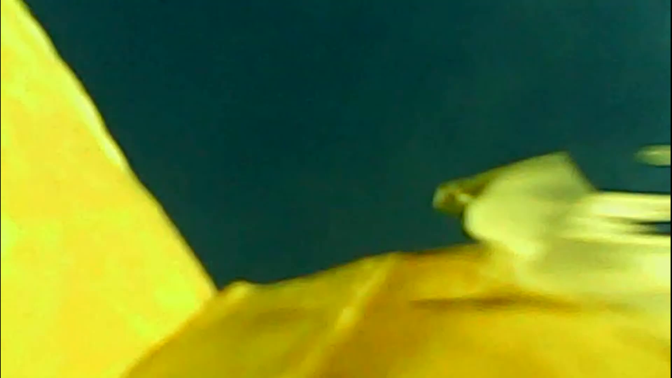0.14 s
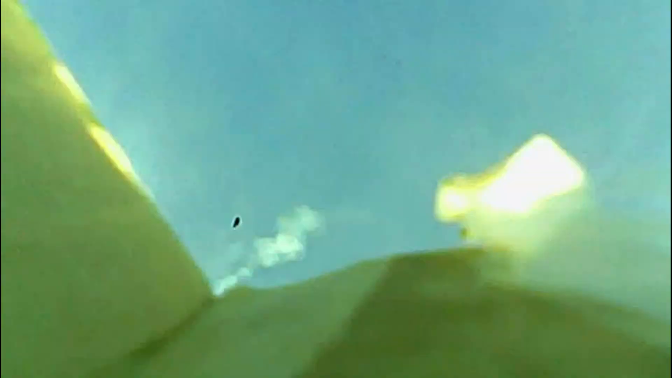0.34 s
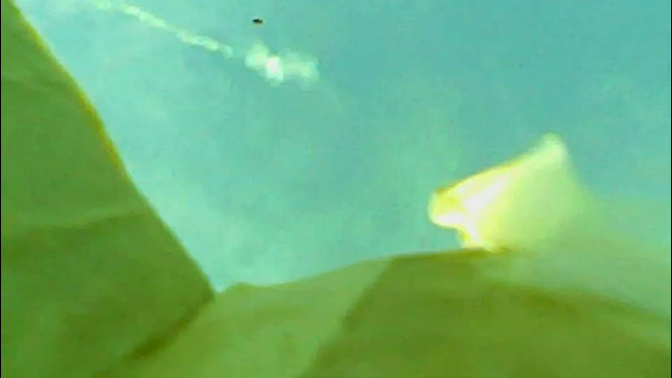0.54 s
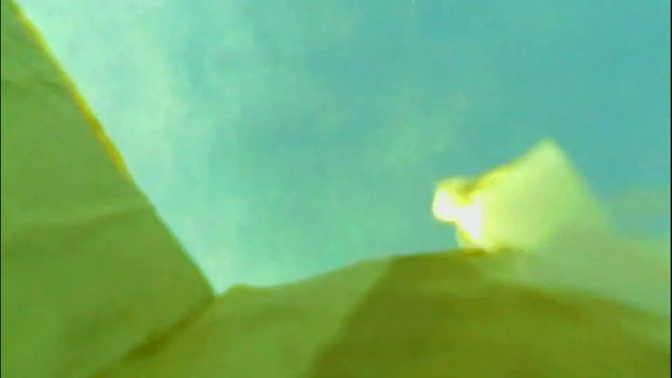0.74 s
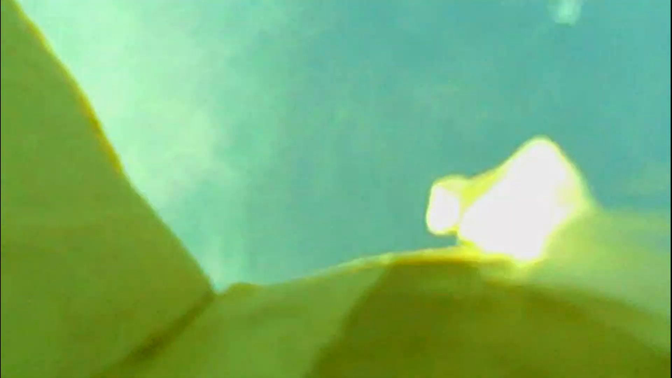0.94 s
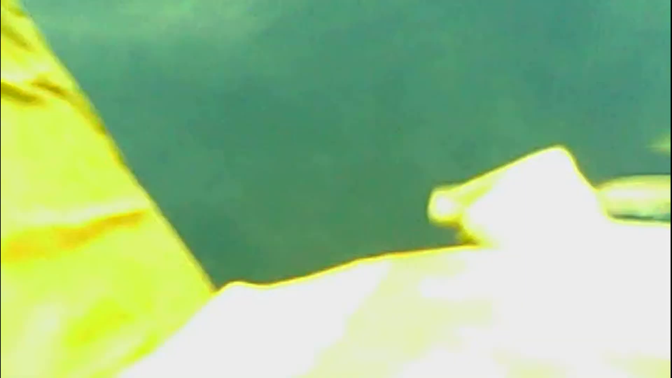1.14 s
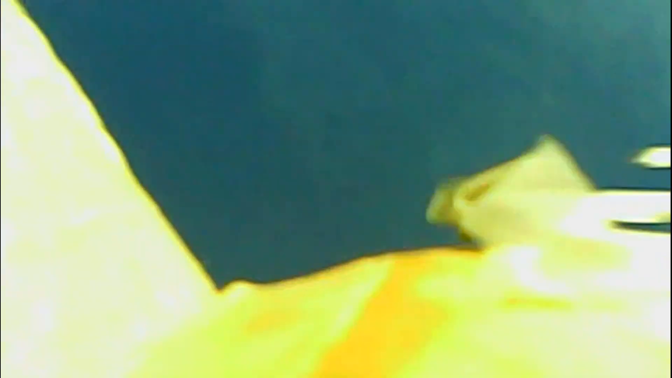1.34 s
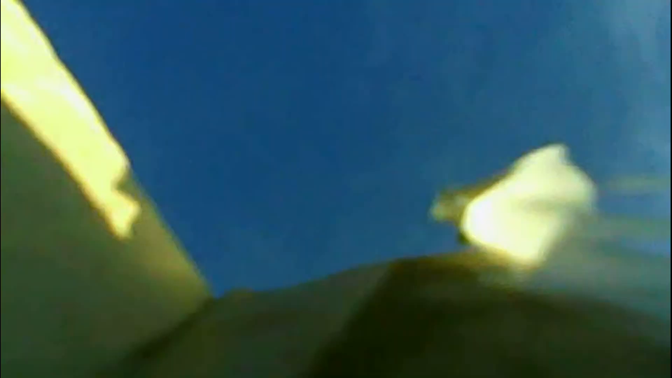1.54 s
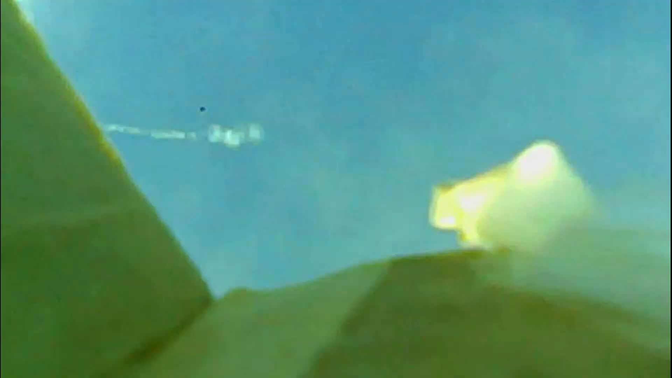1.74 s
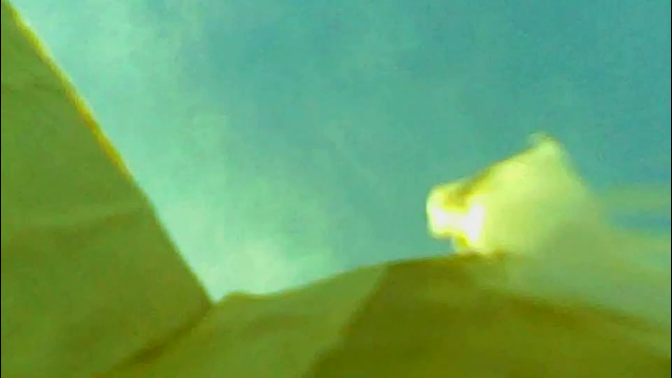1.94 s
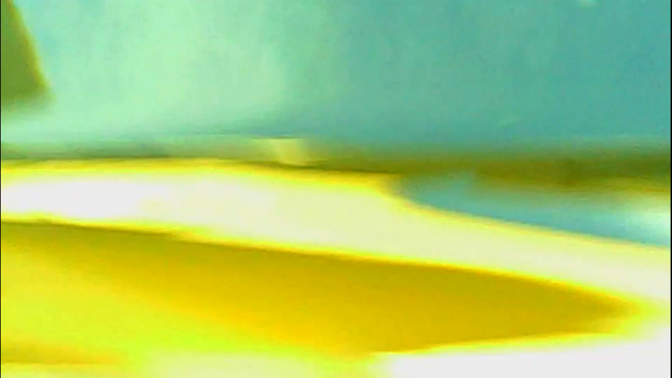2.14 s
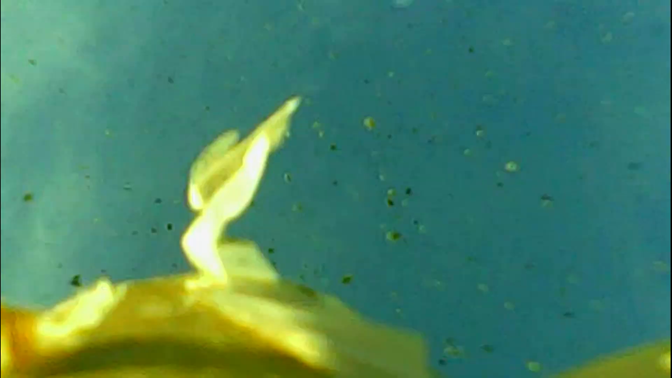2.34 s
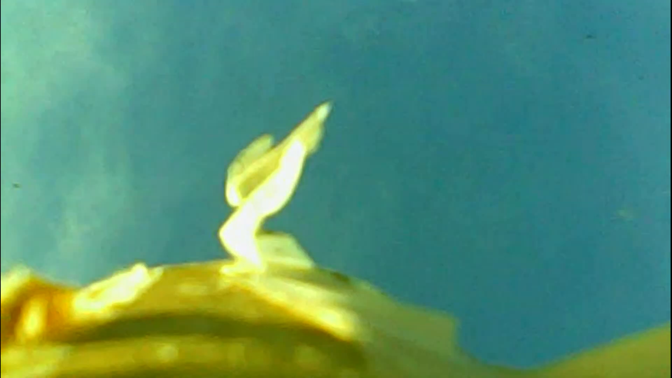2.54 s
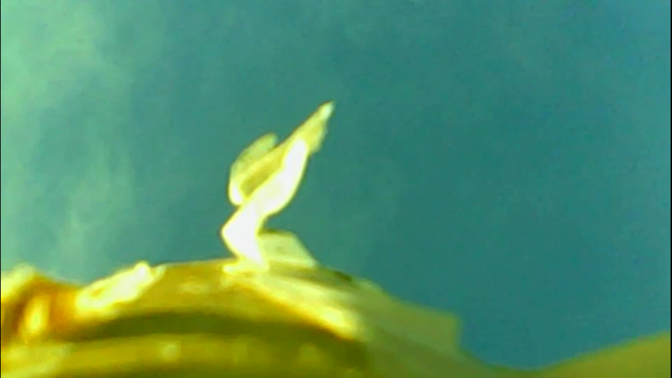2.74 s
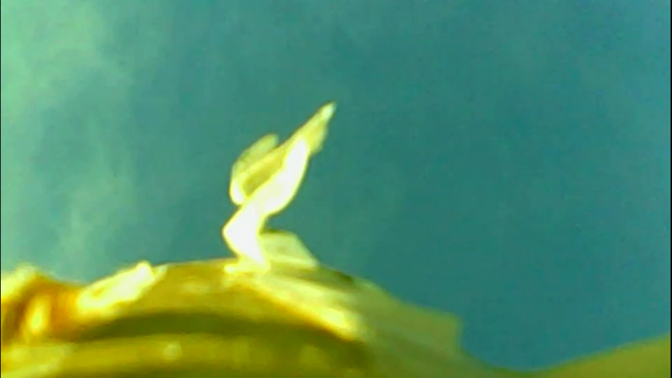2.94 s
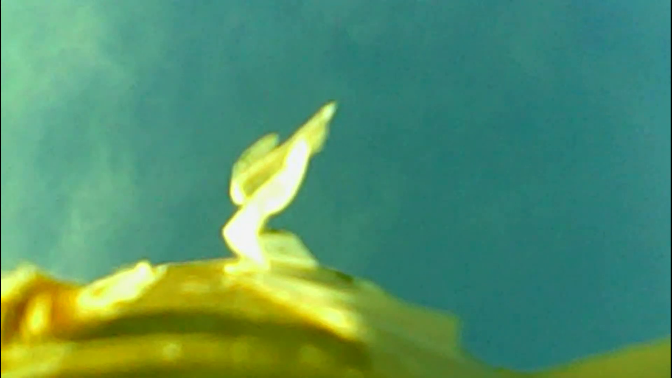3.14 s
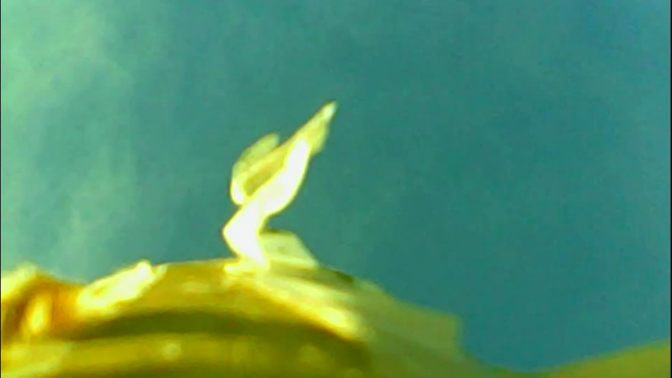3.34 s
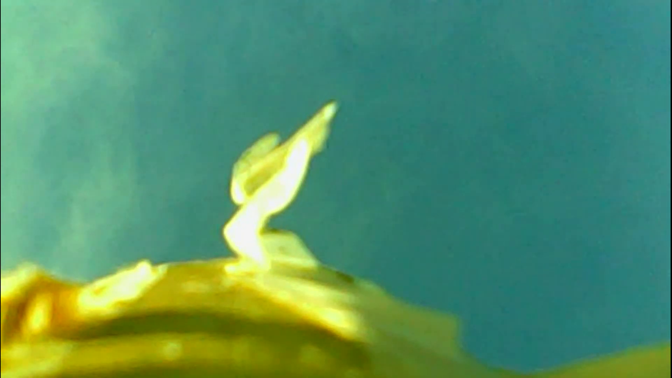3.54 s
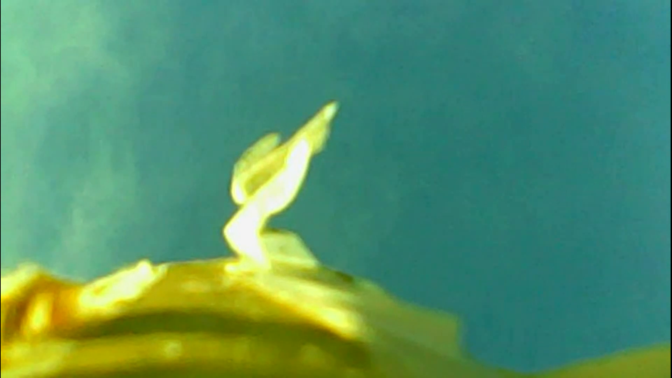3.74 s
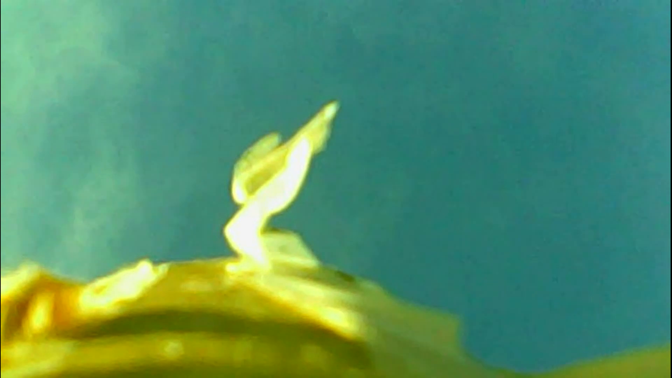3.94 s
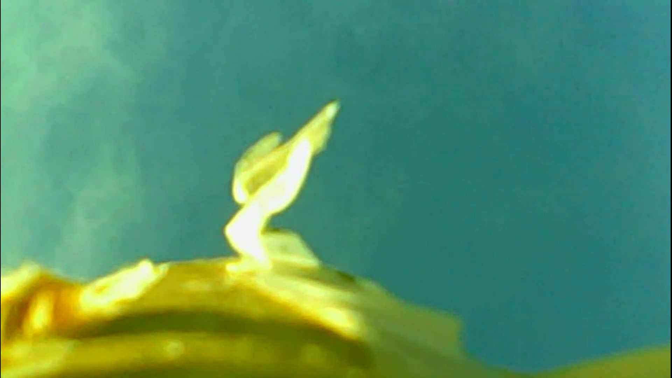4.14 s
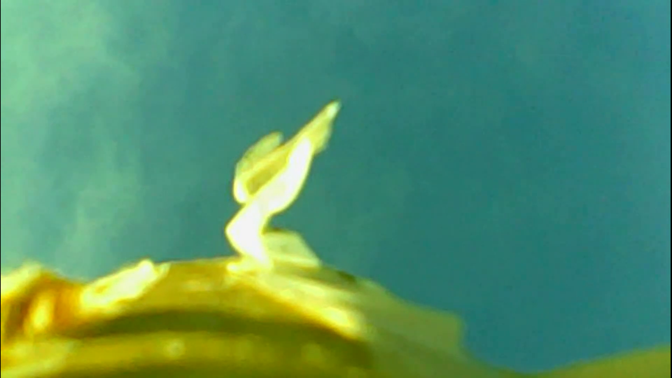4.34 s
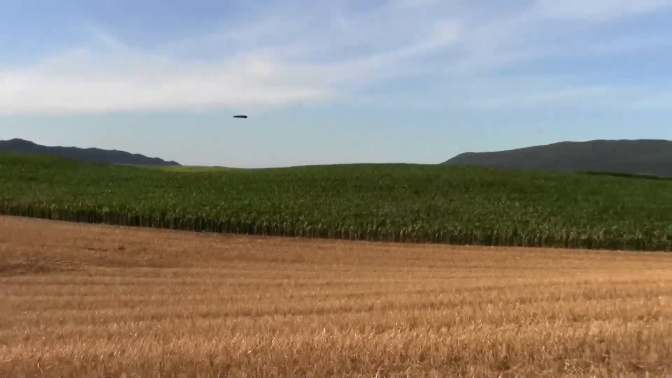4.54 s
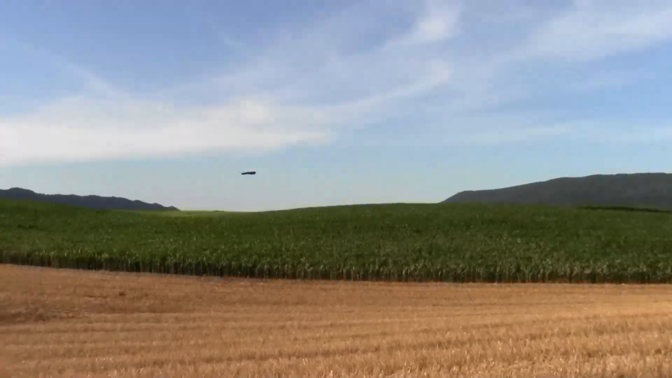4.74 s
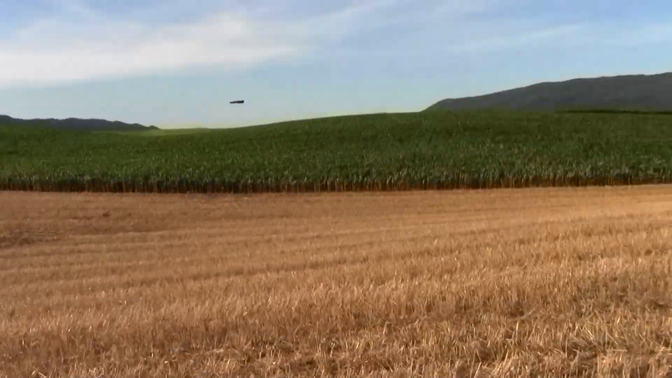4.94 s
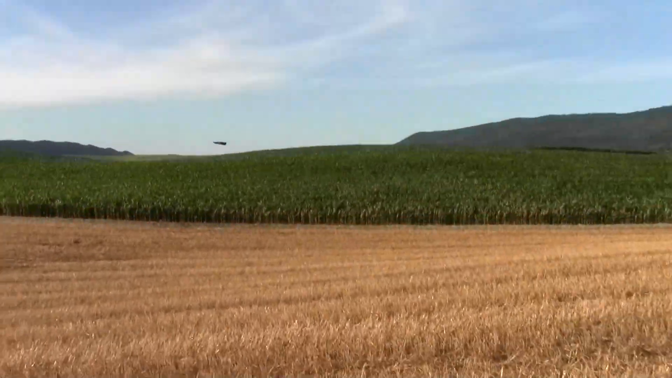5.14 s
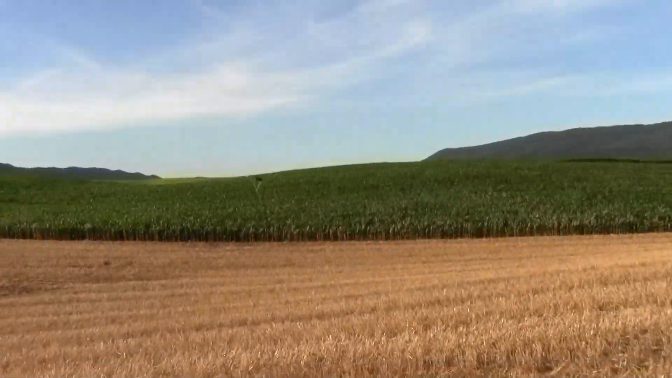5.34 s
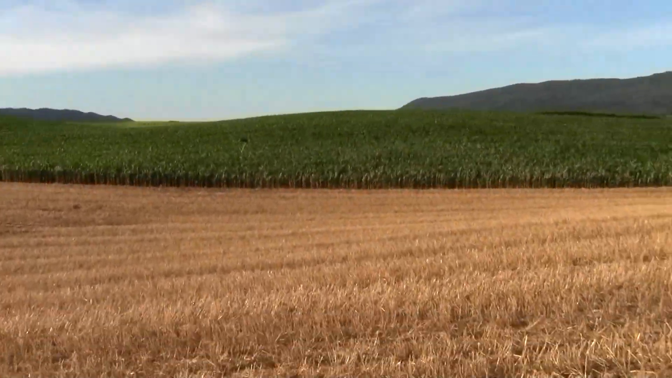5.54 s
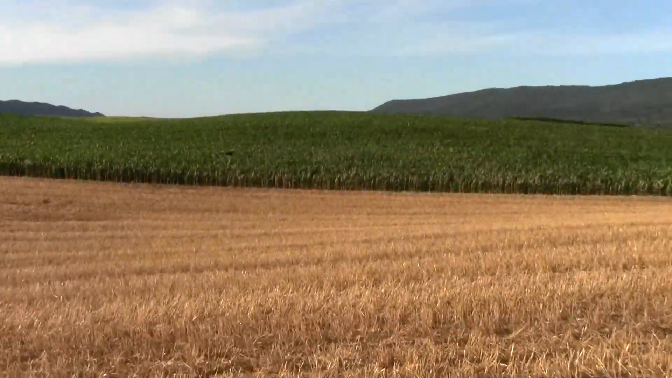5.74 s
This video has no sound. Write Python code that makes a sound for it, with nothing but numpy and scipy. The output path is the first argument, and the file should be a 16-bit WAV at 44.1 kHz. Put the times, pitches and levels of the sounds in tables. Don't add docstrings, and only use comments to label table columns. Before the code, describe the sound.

A very loud, clipped rocket roar fills a tiny onboard mono microphone for about two seconds. The stage rips away with a harsh hiss and the engine dies. Loose parts buzz and tick, the hollow tube hums and knocks, and air hiss fades. A hard cut opens to a quiet stereo field with crunching, snapping dry stalks.

```python
import sys
import numpy as np
from scipy import signal
from scipy.fft import rfft, irfft, next_fast_len
from scipy.io import wavfile
from scipy.ndimage import uniform_filter1d, map_coordinates

SR = 44100
rng = np.random.default_rng(int(sys.argv[2]) if len(sys.argv) > 2 else 0)


def amp(db):
    return 10 ** (np.asarray(db, float) / 20)


def write(x):
    x = np.atleast_2d(x).T
    wavfile.write(sys.argv[1], SR, np.round(np.clip(x, -1, 1) * 32767).astype(np.int16))


N = 259749
TIME = np.arange(N) / SR
TEAR_S = 2.185
BURNOUT_S = 2.36
CUT_S = 4.462


def unit(x):
    return x / np.sqrt(np.mean(x ** 2) + 1e-20)


def along(points, hz):
    point_hz, value = np.transpose(points)
    return np.interp(np.log(hz + 1), np.log(point_hz + 1), value)


def curves(rows):
    s, *columns = np.transpose(rows)
    return [np.interp(TIME, s, column) for column in columns]


def wobble(rate):
    points = rng.standard_normal(int(N * rate / SR) + 4)
    return map_coordinates(points, [TIME * rate])


def filtered(x, response):
    size = next_fast_len(N + 8192)
    spectrum = rfft(x, size) * response(np.fft.rfftfreq(size, 1 / SR))
    return irfft(spectrum, size)[..., :N]


def coloured(x, spectrum):
    return unit(filtered(x, lambda hz: amp(along(spectrum, hz))))


def grit(spread_db, rate):
    return rng.standard_normal(N) * amp(spread_db * wobble(rate))


def sliding_tone(hz):
    return np.sin(2 * np.pi * np.cumsum(hz) / SR)


def snaps(rows, t60, crack, width, rise):
    out = np.zeros(N + SR)
    t = np.arange(SR // 20) / SR
    for (s, db, hz), life in zip(rows, t60):
        noise = rng.standard_normal((2, len(t)))
        drift = np.cumsum(noise[0]) * np.sqrt(2 * np.pi * width * hz / SR)
        fade = amp(-60 * t / life)
        edge = crack * np.sqrt(hz / 2500) * fade * noise[1]
        ring = np.sin(2 * np.pi * hz * t + drift) + edge
        burst = fade * (1 - np.exp(-t / rise)) * ring
        out[round(s * SR):][:len(t)] += amp(db) * burst / np.abs(burst).max()
    return out[:N]


def engine_pressure():
    # time_s, level_db over the overload point
    thrust = [
        (0, 3),
        (1.2, 3),
        (2.18, 5),
        (2.2, -2),
        (2.28, -3.5),
        (2.342, -7.5),
        (2.347, -21),
        (2.4, -29.5),
        (2.46, -50),
    ]
    # pitch_hz, level_db
    roar_colour = [(15, -3), (100, -3), (300, 2.5), (700, 0), (1300, -3.5), (2100, -9), (3000, -49.5),
                   (6000, -37.5), (20000, -83.5)]
    rumble_colour = [(15, -3), (40, -5), (130, 1.5), (220, -2.5), (350, -13), (700, -32)]
    tear_colour = [(300, -36), (800, -27), (1550, -4.5), (1800, -1), (2100, -1.5), (2450, -6), (2900, -7),
                   (4000, -12), (8000, -15.5), (20000, -79.5)]
    roar_db, = curves(thrust)
    torn = TIME > TEAR_S
    rumble_db = 1.89 * roar_db - 4.5 - 2 * torn
    tear_db = roar_db + np.interp(TIME, [TEAR_S, TEAR_S + 0.01], [-13, -2])

    exhaust = amp(roar_db + 0.7 * wobble(25)) * coloured(rng.standard_normal(N), roar_colour)
    thinned = filtered(exhaust, lambda hz: 1 / (1 - 250j / (hz + 1)))
    exhaust = np.where(torn, thinned, exhaust)
    rumble = amp(rumble_db + 0.31 * wobble(15)) * coloured(rng.standard_normal(N), rumble_colour)
    tearing = amp(tear_db) * coloured(grit(spread_db=2.0, rate=80), tear_colour)
    return (exhaust + rumble + tearing) * (TIME < thrust[-1][0])


def overloaded(pressure):
    # pitch_hz, level_db
    grain_colour = [(100, -5.5), (2000, 2), (4000, -5), (7000, -13), (9000, -14.5), (11000, -23.5),
                    (12500, -44), (16000, -25)]
    squared = 0.78 * pressure / (1 + np.abs(pressure) ** 8) ** (1 / 8)
    dulled = filtered(squared, lambda hz: 1 / (1 + 1.5j * hz / 3400 - (hz / 3400) ** 2) / (1 + 1j * hz / 6000))
    loudness = np.sqrt(np.abs(uniform_filter1d(dulled ** 2, size=900)))
    return dulled + amp(-25.5) * loudness * coloured(rng.standard_normal(N), grain_colour)


def flickering_treble(x):
    # start_s, end_s, recovery_hz_per_s
    dull_spells = [
        (1.771, 2.007, 1500),
        (2.074, 2.5, 11050),
    ]
    hz, t, z = signal.stft(x, SR, nperseg=512)
    edge_hz = np.full(len(t), 12200.0)
    for start, end, recovers in dull_spells:
        edge_hz = np.where((t > start) & (t < end), 7200 + recovers * (t - start), edge_hz)
    edge_hz = edge_hz * (1 + 0.03 * rng.standard_normal(len(t)))
    luck = rng.random(len(t))
    edge_hz = np.where(luck < 0.04, np.minimum(edge_hz, 6500), edge_hz)
    edge_hz = np.where((luck > 0.97) & (edge_hz > 11000), 16000, edge_hz)
    leak_db = np.where(hz > 12300, -22, -50) - 20 * (edge_hz > 10000)[:, None]
    blocks = np.kron(rng.exponential(1, (33, len(t) // 5 + 1)), np.ones((8, 5)))[:len(hz), :len(t)]
    ragged_hz = edge_hz - np.where(edge_hz < 10500, 900, 250) * (blocks - 1)
    gain = np.where(hz[:, None] < ragged_hz, 1, amp(leak_db.T))
    return signal.istft(z * gain, SR, nperseg=512)[1][:N]


def roar():
    return flickering_treble(overloaded(engine_pressure()))


def tube():
    # time_s, pitch_hz, level_db
    song = [
        (2.38, 485, -56),
        (2.388, 479, -24),
        (2.394, 485, -29.5),
        (2.572, 484.2, -35),
        (2.646, 489, -43),
        (2.702, 490, -53),
        (2.82, 484, -63),
        (2.85, 476, -54),
    ]
    # start_s, peak_db, t60_s (time to fade by 60 dB)
    wall_blows = [
        (2.8707, -5, 0.088),
        (2.9137, -9.5, 0.085),
        (2.933, -17, 0.072),
        (3.477, -16.5, 0.092),
        (3.52, -21, 0.13),
    ]
    cap_blows = [
        (4.1788, -12.5, 0.038),
    ]
    # low mode Hz, neighbour Hz, neighbour's share, upper mode Hz
    wall, cap = (249, 315, 0.79, 447), (495, 510, 0.044, 440)

    hz, db = curves(song)
    singing = (TIME > song[0][0]) * (TIME < song[-1][0])
    out = np.zeros(N + SR)
    out[:N] = np.sqrt(2) * amp(db) * sliding_tone(hz) * singing
    t = np.arange(SR // 4) / SR
    blows = [row + wall for row in wall_blows] + [row + cap for row in cap_blows]
    for s, db, t60, low_hz, next_hz, share, upper_hz in blows:
        low = np.sin(2 * np.pi * low_hz * t)
        upper = np.sin(2 * np.pi * upper_hz * t)
        neighbour = share * amp(20 * t / t60) * np.sin(2 * np.pi * next_hz * t)
        beating = 0.39 * (low - neighbour)
        blow = amp(-130 * t / t60) * (0.73 * low + 0.5 * amp(0.62 * (db + 8.5)) * upper)
        ping = 0.14 * amp(0.5 * (db + 8) - 60 * t / t60) * np.sin(2 * np.pi * 1.98 * upper_hz * t)
        thud = 0.36 * amp(-30 * t / t60) * np.sin(1.2 * np.pi * low_hz * t)
        envelope = amp(db - 60 * t / t60) * (1 - np.exp(-t / 0.001))
        out[round(s * SR):][:len(t)] -= envelope * (beating + blow + thud + ping)
    return out[:N]


def rattle():
    # pitch_hz, width_hz, level_db
    shell_modes = [(900, 120, -12), (1630, 90, -2), (2000, 170, 0), (2600, 170, -1), (3150, 200, -15),
                   (3900, 500, -16)]
    # pitch_hz, level_db
    shake_colour = [(300, -10), (1000, -10), (3500, -12), (4500, -21), (5500, -26), (7000, -27),
                    (11000, -33.5), (12500, -56), (14000, -102)]
    # full_at_s, hold_s, level_db, fall_db_per_s
    shakes = [
        (2.488, 0.12, -26, 151),
        (2.82, 0.17, -56.5, 25),
        (3.293, .02, -63, 28.5),
    ]
    # start_s, peak_db, ring_hz
    tick_rows = [(2.38, -14, 2910), (2.426, -5.5, 2230), (2.481, -12, 1795), (2.501, -10, 1990),
                 (2.535, -4, 2557), (2.605, -18, 1930), (2.688, -19.5, 2400), (2.7239, -25.5, 1203),
                 (2.816, -30, 1500), (2.8755, -16, 1530), (2.882, -16.5, 1830), (2.9175, -27, 1700),
                 (2.932, -24, 1160), (3.039, -23, 965), (3.046, -30, 1320), (3.066, -35, 1300),
                 (3.32, -32, 891), (3.328, -31, 800), (3.341, -25, 1000), (3.3502, -12.5, 1300),
                 (3.3508, -12, 2120), (3.354, -19, 770), (3.36, -26, 1980), (3.4205, -30.5, 2700),
                 (3.4415, -33, 835), (3.444, -33, 1900), (3.5975, -44.5, 2700), (3.927, -41, 2600)]

    def shell(f):
        return sum((-1) ** k * amp(db) * 1j * f * w / (c * c - f * f + 1j * f * w)
                   for k, (c, w, db) in enumerate(shell_modes))

    def port(hz):
        return 1.2 / (1 + 1.3j * hz / 4200 - (hz / 4200) ** 2) ** 3 / (1 - 400j / (hz + 1))

    cycle = np.cumsum(52 * amp(2.5 * wobble(30))) / SR % 1
    contacts = amp(-7 * cycle) * grit(spread_db=1.8, rate=200)
    between = coloured(grit(spread_db=6.0, rate=210), shake_colour)
    buzz = unit(unit(filtered(contacts, shell)) + 0.42 * between)
    shaking = 0
    for s, hold, db, fall_db in shakes:
        rise = 117.5 * np.maximum(s - TIME, 0)
        fall = fall_db * np.maximum(TIME - s - hold, 0)
        shaking = shaking + amp(db - rise - fall)
    shaking = shaking * (TIME > BURNOUT_S)
    lives = [0.015 * (1500 / hz) ** 0.43 for s, db, hz in tick_rows]
    ticks = snaps(tick_rows, lives, crack=1.1, width=0.22, rise=0.0004)
    return shaking * buzz + filtered(ticks, lambda hz: port(hz) * (1 + 0.5 * shell(hz)))


def squeak():
    # time_s, pitch_hz, level_db
    rub = [
        (3.26, 1480, -70),
        (3.285, 1394, -45),
        (3.31, 1500, -48),
        (3.36, 1930, -49),
        (3.405, 1650, -53),
        (3.435, 1490, -49),
        (3.47, 1405, -51),
        (3.49, 1380, -75),
    ]
    hz, db = curves(rub)
    rubbing = sliding_tone(hz * (1 + 0.06 * wobble(200)))
    return amp(db - 4 + 5 * wobble(60)) * rubbing * (TIME > rub[0][0]) * (TIME < rub[-1][0])


def coasting():
    # pitch_hz, level_db
    buffet_colour = [(10, -12), (40, -1), (90, -6), (200, -13.5), (400, -29.5), (800, -56.5)]
    hiss_colour = [(150, -1), (400, 0.5), (1200, -4), (2000, -8), (2800, -17), (4200, -20.5), (5500, -25.5),
                   (9000, -33.5), (11000, -36), (12500, -40), (14000, -68)]
    murmur_colour = [(1200, -40), (1600, -3), (1800, -1), (2100, -31.5)]
    # centre_s, level_db, half_length_s, pitch_hz
    gusts = [
        (3.282, -49.5, .04, 240),
        (4.01, -49, 0.037, 191),
    ]
    # pitch_hz, level_db
    whine = [(1061, -62), (10492, -78), (11558, -85)]

    since = np.maximum(TIME - BURNOUT_S, 0)
    buffet_db = -54.5 + 19 * np.exp(-(since / 0.42) ** 2)
    buffet = amp(buffet_db) * coloured(grit(spread_db=1.2, rate=12), buffet_colour)
    hiss_db = -55 + 13.5 * np.exp(-since / 0.57) + 1.3 * wobble(6.1)
    hiss = amp(hiss_db) * coloured(rng.standard_normal(N), hiss_colour)
    murmur = amp(-73 + 3 * wobble(14)) * coloured(rng.standard_normal(N), murmur_colour)
    puffs = sum(amp(db) * np.exp(-((TIME - s) / half) ** 2) * sliding_tone(hz * (1 + 0.14 * wobble(37)))
                for s, db, half, hz in gusts)
    tones = sum(amp(db + 0.5 + 2.2 * wobble(30)) * np.sin(2 * np.pi * hz * TIME) for hz, db in whine)
    offset = -0.0047
    return (buffet + hiss + murmur + puffs + tones + offset) * (TIME > BURNOUT_S)


def pressing():
    # start_s, swell_s, hold_s, level_db, rustle_over_crunch_db
    steps = [(4.47, 0.013, 0.162, -37, -6), (4.688, 0.033, .02, -41, -1.5), (4.741, 0.052, 0.076, -34, 6),
             (4.869, 0.056, 0.022, -38.5, 2.5), (4.976, 0.066, 0.0077, -38.5, -1),
             (5.076, 0.13, 0.02, -36, -3.5), (5.29, 0.078, 0.014, -32, 4.5),
             (5.389, .01, 0.054, -39.5, 3.5), (5.451, 0.011, 0.011, -35, 3.5),
             (5.488, 0.027, 0.017, -31.5, 0), (5.55, .005, 0.024, -50, 10), (5.6, .02, .04, -54, 2),
             (5.642, 0.036, 0.081, -42.5, -4.5), (5.758, 0.0098, 0.066, -48, 6.5),
             (5.85, 0.05, .03, -44, 3)]
    s, swell, hold, db, rustle_db = np.transpose(steps)[..., None]
    after = TIME - s - swell
    rise_db = 6 * np.minimum(after / swell, 0)
    sag_db = 39 * np.maximum(after, 0)
    release_db = 420 * np.maximum(after - hold, 0)
    landing = np.clip((TIME - s) / 0.004, 0, 1)
    gain = amp(np.maximum(db + rise_db - sag_db - release_db, -120)) * landing
    crunch = np.sqrt(np.sum(gain ** 2, axis=0))
    rustle = np.sqrt(np.sum((gain * amp(rustle_db)) ** 2, axis=0))
    return crunch, rustle


def twigs(rustle):
    luck = rng.random((70, 3))
    s = CUT_S + luck[:, 0] * (TIME[-1] - CUT_S)
    rustle_db = 20 * np.log10(np.interp(s, TIME, rustle) + 1e-4)
    db = rustle_db + 3 - 1.5 * np.log(luck[:, 1])
    hz = 3500 * 6 ** (luck[:, 2] - 0.5)
    return list(zip(s, db, hz))


def stereo_grains(spread_db, rate, spectrum):
    # pitch_hz, likeness (1 = the same)
    likeness = [(100, 0.75), (1000, 0.96), (2800, .95), (4000, 0.89), (5500, 0.93), (9000, 0.8),
                (11000, .7), (13000, .35)]
    size = amp(spread_db * wobble(rate) + 0.25 * spread_db * wobble(rate / 9))

    def mid_side(hz):
        angle = np.arccos(np.clip(along(likeness, hz), -1, 1)) / 2
        return amp(along(spectrum, hz)) * [np.cos(angle), np.sin(angle)]

    mid, side = filtered(size * rng.standard_normal((2, N)), mid_side)
    return unit(np.array([mid + side, mid - side]))


def stalk_breaks(rustle):
    # start_s, peak_db, ring_hz
    stalk_rows = [(4.466, -14, 870), (4.491, -19.5, 910), (4.508, -16, 595), (4.601, -22.5, 5000),
                  (4.697, -26, 5100), (4.711, -35, 2480), (4.722, -27, 3000), (4.746, -17, 5900),
                  (4.754, -14.5, 6590), (4.785, -8, 6320), (4.809, -7, 6760), (4.864, -10, 5440),
                  (4.868, -10, 5530), (4.926, -13.5, 5680), (4.94, -18.5, 700), (4.956, -20, 5300),
                  (4.975, -20, 5970), (5.152, -22, 606), (5.291, -11.5, 2440), (5.293, -26, 6274),
                  (5.345, -16, 6040), (5.37, -17.5, 3000), (5.452, -21, 1040), (5.466, -18, 1100),
                  (5.61, -23, 5810), (5.623, -25.5, 5740), (5.756, -22, 1750), (5.775, -21.5, 4700),
                  (5.801, -21.5, 7030), (5.848, -20.5, 1310)]

    def air(hz):
        return 1 / (1 + 1.4j * hz / 9000 - (hz / 9000) ** 2) ** 2 / (1 - 350j / (hz + 1)) ** 2

    lean_db = np.interp(TIME, [row[0] for row in stalk_rows], 1.5 * rng.standard_normal(len(stalk_rows)))
    breaks = stalk_rows + twigs(rustle)
    stalks = snaps(breaks, [0.012] * len(breaks), crack=0.7, width=0.2, rise=0.00025)
    return filtered(stalks, air) * amp(np.outer([1, -1], lean_db) - 1.0)


def quiet_field():
    # pitch_hz, level_db
    field_colour = [(20, -24.5), (45, -16), (90, -1.5), (200, -7), (400, -12), (1200, -10.5), (2800, -20),
                    (4200, -24), (9000, -28), (11000, -31), (13000, -43), (16000, -44.5)]
    return amp(-48) * stereo_grains(spread_db=2.0, rate=23, spectrum=field_colour)


def stubble():
    # pitch_hz, level_db
    crunch_colour = [(100, -17), (200, -5.5), (400, 1), (700, 0.5), (1200, 0), (2000, -3), (2800, -10.5),
                     (4000, -15), (8000, -35)]
    rustle_colour = [(1000, -18), (2000, -3.5), (2800, -3.5), (4200, -10), (5500, -3), (7000, -5.5),
                     (9000, -6.5), (11000, -10), (12500, -19), (13800, -16.5), (14500, -43.5), (16000, -56)]
    crunch, rustle = pressing()
    crush = crunch * stereo_grains(spread_db=4.0, rate=300, spectrum=crunch_colour)
    crush = crush + rustle * stereo_grains(spread_db=3, rate=550, spectrum=rustle_colour)
    crush = filtered(crush, lambda hz: 1 / (1 - 90j / (hz + 1)) ** 2)
    return (crush + stalk_breaks(rustle) + quiet_field()) * amp([[-0.3], [0.3]])


def patchy_treble(x, edge_hz, depth_hz, spared):
    hz, t, z = signal.stft(x, SR, nperseg=512)
    luck = np.kron(rng.exponential(1, (17, len(t) // 4 + 1)), np.ones((16, 4)))[:len(hz), :len(t)]
    strips = np.kron(rng.random((52, len(t) // 7 + 1)), np.ones((5, 7)))[:len(hz), :len(t)]
    kept = (hz[:, None] < edge_hz(t) - depth_hz * (luck - 1)) | (strips < spared)
    return signal.istft(z * np.where(kept, 1, amp(-34.5)), SR, nperseg=512)[1][..., :N]


def split(x):
    # start_s, length_s, level_db under the sound
    moments = [
        (0.444, 0.022, -20.5),
        (0.859, 0.071, -22),
        (1.234, 0.019, -20),
        (1.767, 0.02, -24.5),
        (2.072, 0.015, -25),
        (2.458, 0.027, -32),
        (3.37, .02, -30),
    ]
    hz, t, z = signal.stft(x, SR, nperseg=1024)
    tilt = (hz[:, None] / 800 + 0.4) ** 0.4
    scrambled = z * tilt * np.exp(2j * np.pi * rng.random(z.shape))
    trace = signal.istft(scrambled, SR, nperseg=1024)[1][:N]
    gate = sum(amp(db) * (TIME > s) * (TIME < s + length) for s, length, db in moments)
    side = uniform_filter1d(gate, size=500) * trace
    return np.array([x + side, x - side])


def scene():
    coast = tube() + rattle() + squeak() + coasting()
    coast = patchy_treble(coast, lambda t: 11900 + 0 * t, depth_hz=700, spared=0)
    rustle_db = 20 * np.log10(pressing()[1] + amp(-52))

    def field_edge_hz(t):
        return 14000 + 150 * (np.interp(t, TIME, rustle_db) + 31)

    field = patchy_treble(stubble(), field_edge_hz, depth_hz=450, spared=0.35)
    return np.where(TIME < CUT_S, split(roar() + coast), field)


def low_pass(x):
    return signal.sosfilt(signal.butter(12, 15800, fs=SR, output="sos"), x)


def record(dry):
    return low_pass(dry)


dry = scene()
out = record(dry)
write(out)
```